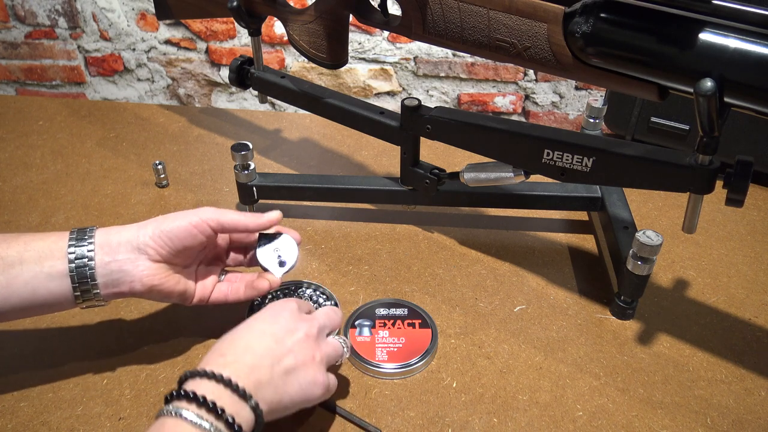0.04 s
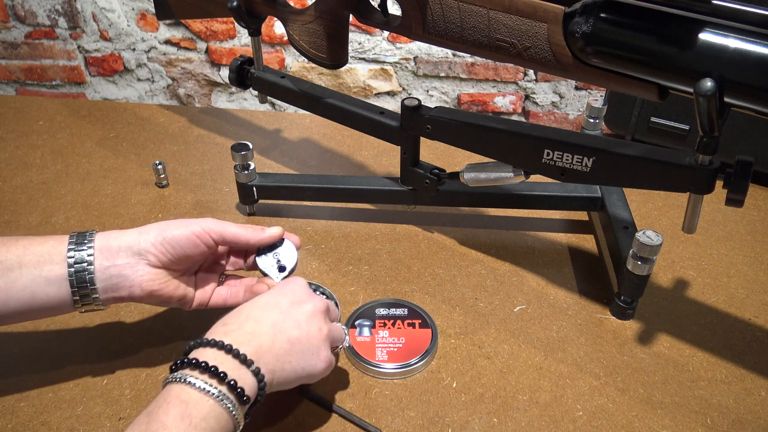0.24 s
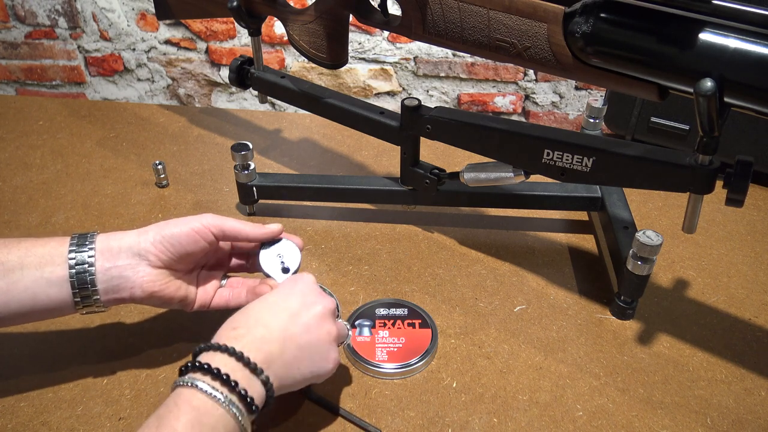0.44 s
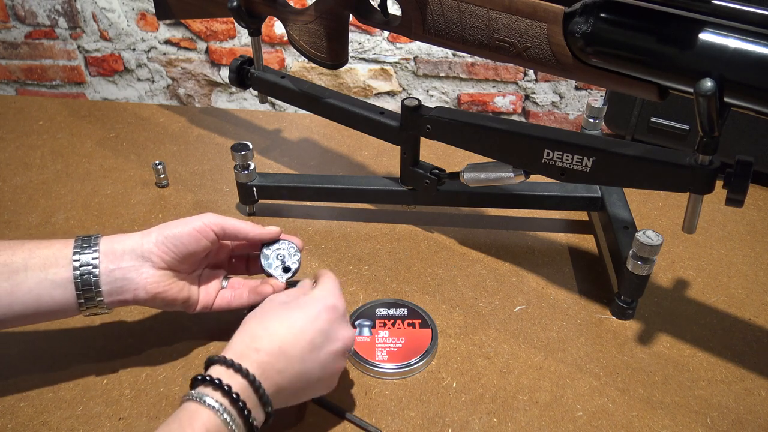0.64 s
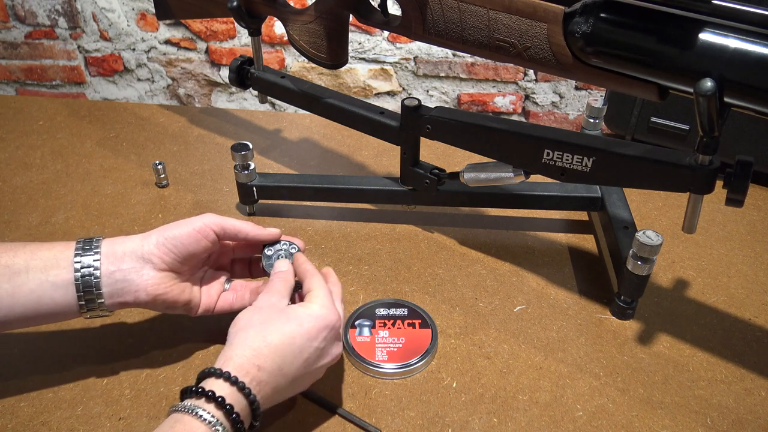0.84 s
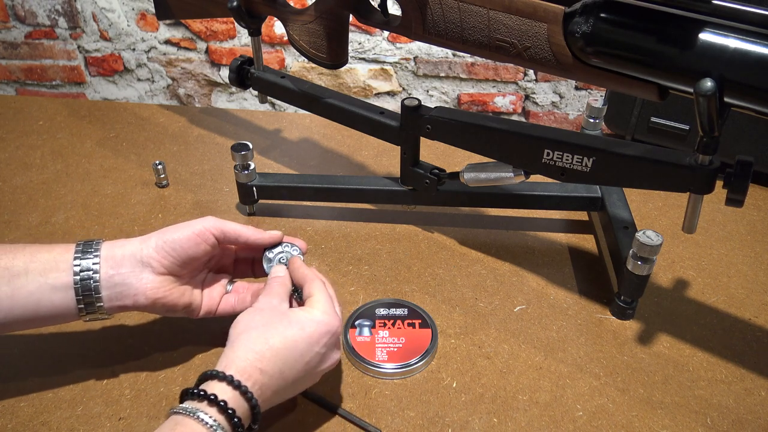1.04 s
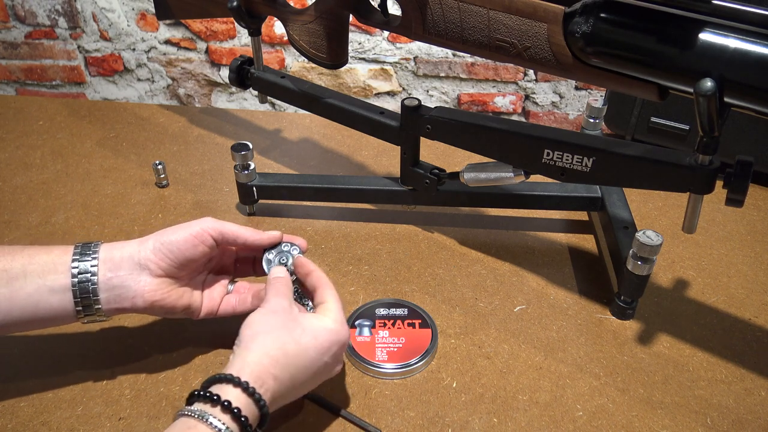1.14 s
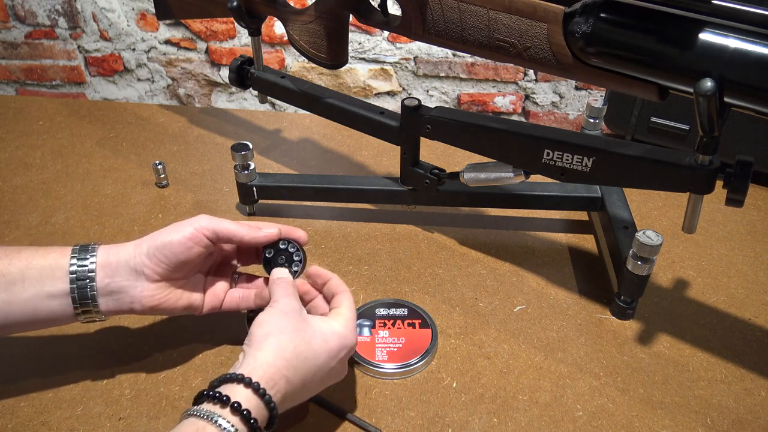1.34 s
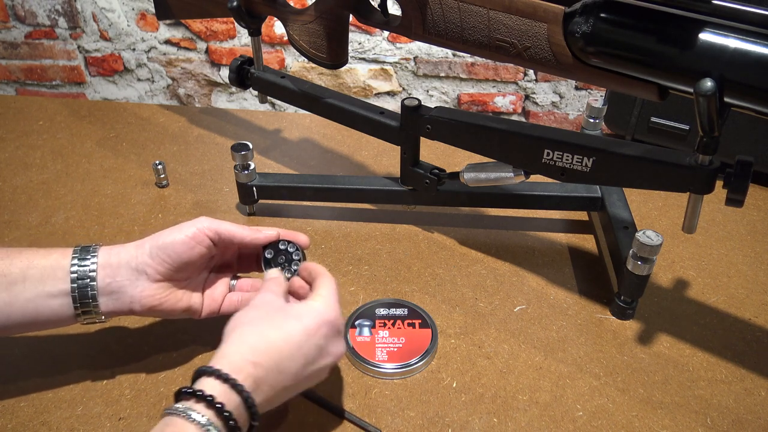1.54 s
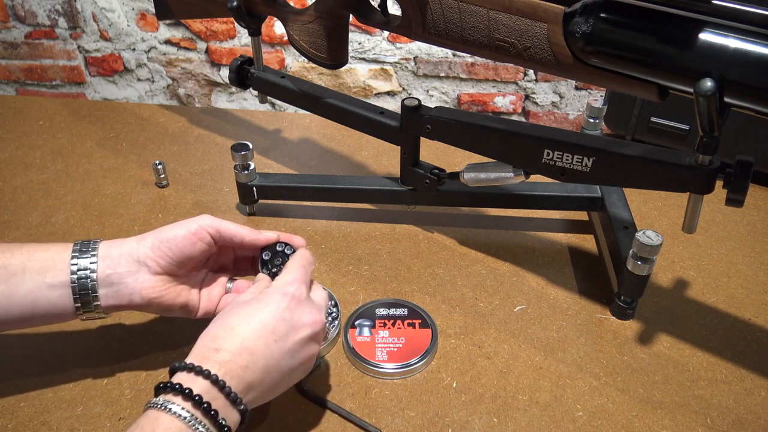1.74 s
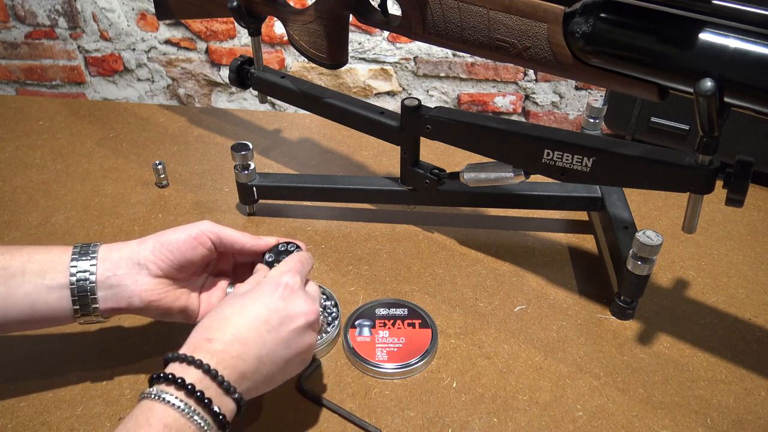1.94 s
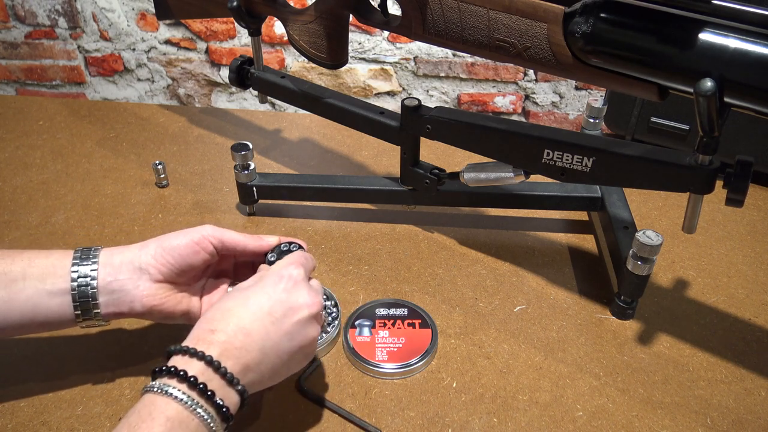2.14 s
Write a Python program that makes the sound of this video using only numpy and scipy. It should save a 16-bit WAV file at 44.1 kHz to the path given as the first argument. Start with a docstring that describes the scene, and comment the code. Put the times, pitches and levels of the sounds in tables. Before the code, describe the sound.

Metal pellets knock and ring briefly in a tin, picked out by hand close to the microphone. Then they go into a small magazine with light, dry clicks and a brief fingertip rub, in a quiet, faintly humming room.

```python
"""A small room with a faint hum, close to a tin on a table.
Fingers fish for metal pellets: the tin knocks, rattles and rings, and one bright ping sounds.
The pellets are then pressed into a small rotary magazine, whose shell gives dry clicks;
a fingertip rubs briefly over it. The room answers with a short diffuse tail."""
import sys
import numpy as np
from scipy import signal
from scipy.fft import rfft, irfft
from scipy.io import wavfile
from scipy.ndimage import uniform_filter1d

SR = 44100
rng = np.random.default_rng(int(sys.argv[2]) if len(sys.argv) > 2 else 0)


def output_pcm(signal):
    """Save a mono or channel-first signal as 16-bit PCM at the path in sys.argv[1].

    Samples are clipped to [-1, 1] before scaling.
    """
    pcm = np.clip(np.atleast_2d(signal).T, -1, 1) * 32767
    wavfile.write(sys.argv[1], SR, np.round(pcm).astype(np.int16))


N = 97020
T = np.arange(N) / SR
BINS_HZ = np.fft.rfftfreq(4096, 1 / SR)


def amp(db):
    """dB to gain."""
    return 10 ** (np.asarray(db) / 20)


def unit_rms(x):
    """Scales to rms 1."""
    return x / np.sqrt(np.mean(x ** 2) + 1e-20)


def curve(points, hz):
    """Interpolates a table over log frequency."""
    freqs, values = np.transpose(points)
    return np.interp(np.log(hz + 1), np.log(freqs + 1), values)


def add(mix, start_s, sound):
    """Mixes a sound in at start_s."""
    part = mix[round(start_s * SR):][:len(sound)]
    part += sound[:len(part)]


def coloured(x, spectrum):
    """Filters by a spectrum table; output rms 1."""
    gain = amp(curve(spectrum, np.fft.rfftfreq(N, 1 / SR)))
    return unit_rms(irfft(rfft(x) * gain, N))


def swells(rows):
    """Sum of Gaussian envelopes."""
    return sum(amp(db) * np.exp(-((T - centre_s) / half_s) ** 2) for centre_s, half_s, db in rows)


def impose(noise, gain, smooth_bins):
    """Levels the noise's broad spectral humps and applies gain, at minimum phase."""
    spectrum = rfft(noise)
    humps = np.sqrt(np.maximum(uniform_filter1d(abs(spectrum) ** 2, size=smooth_bins), 1e-20))
    log_gain = np.log(np.maximum(gain / humps, 1e-5))
    mirrored = np.r_[log_gain, log_gain[-2:0:-1]]
    minimum_phase = np.exp(np.conj(signal.hilbert(mirrored)))[:len(gain)]
    return irfft(spectrum * minimum_phase)


def contact(body_gain, chatter_s, chatter_db):
    """A unit impulse and a short random chatter, through a body."""
    t = T[:2 * len(BINS_HZ) - 2]
    force = rng.standard_normal(len(t)) * np.exp(-(t / chatter_s) ** 2)
    force *= amp(chatter_db) / np.linalg.norm(force)
    force[0] = 1
    return impose(force, body_gain, smooth_bins=60)[:len(BINS_HZ)]


def tail(x, spectrum, t60_table, rise_s):
    """Diffuse tail of x; each band decays at its own rate."""
    hz, t, bands = signal.stft(rng.standard_normal(SR), SR, nperseg=256)
    t60_s = curve(t60_table, hz)[:, None]
    noise = signal.istft(bands * np.exp(-np.log(1000) * t / t60_s), SR)[1][:SR]
    noise *= 1 - np.exp(-T[:SR] / rise_s)
    gain = amp(curve(spectrum, np.fft.rfftfreq(SR, 1 / SR)))
    response = impose(noise, gain, smooth_bins=120)
    return signal.fftconvolve(x, response[:SR // 2])[:N]


# Pellet knocks: (time [s], level [dB], pitch [Hz], bass [dB], treble [dB], top [dB], chatter [dB])
# Bands re level; chatter re first touch.
KNOCKS = [(0.0913,-9,2210,-9,-10,-11.5,9), (0.1034,-5,2930,-5.5,-30,-20,-6),
          (0.114,-12.5,3300,-7,-25,-12,1), (0.1224,-19,1770,5,-22,-10,17), (.199,-3,2980,-32,-22,-22,7),
          (.2079,6,1760,-30,-25,-19,35), (0.2169,2.5,2970,-12,-17,-17,9), (0.2239,2.5,2560,-6,-19,-12.5,19),
          (.232,4,2100,-17,-34,-35,3), (0.2525,10.5,2170,-11.5,-18,-19,21), (0.2765,1,2510,-3,-36,-33,11),
          (.2773,13.5,2910,-16,-9.5,-12,16), (0.288,6.5,1900,-7.5,-27,-26,1),
          (0.2956,7.5,2130,-9,-30,-23,-2), (0.3222,9,2250,-8.5,-11.5,-22,7), (0.3366,8,2780,-9,-34,-22.5,5),
          (0.357,-12,2780,7.5,-28,-30,4), (0.3863,21,2840,-4,-19.5,-27,6), (0.398,5.5,3000,-1,-22,-35,2),
          (0.402,11,2850,-8.5,-22,-20,10), (0.4076,17,3500,-9,-14.5,-13.5,8), (0.419,13,3470,-17,-28,-24,6),
          (.475,-5,3200,-24,-18,-26,-9), (.4528,20,3060,-12.5,-15,-27,5),
          (0.4872,15,3210,-11.5,-15.5,-26.5,0), (0.4953,9.5,3150,-13,-3.5,-24.5,0.5),
          (0.5149,10.5,3140,-13.5,-21,-34,7), (0.5334,9,3100,-25,-13.5,-29.5,10),
          (.548,2,3000,-2.5,-35,-43,3)]

def knocks():
    """Each knock excites a broad, quickly damped resonance of the pellet-filled tin."""
    out = np.zeros(N)
    for start_s, db, pitch_hz, bass, treble, top, chatter_db in KNOCKS:
        broadband = [(80, bass - 28), (150, bass - 1), (1000, bass + 1),
                     (1500, -2), (3700, -5.5), (4400, -10.5),
                     (5100, treble), (6600, treble - 4),
                     (8800, top + 3), (11000, top - 1), (15000, top - 2)]
        resonance = amp(4.5) ** 2 / (1 + ((BINS_HZ - pitch_hz) / 600) ** 2) ** 3
        gain = np.sqrt(amp(curve(broadband, BINS_HZ)) ** 2 + resonance)
        add(out, start_s, amp(db) * contact(gain, chatter_s=0.0034, chatter_db=chatter_db))
    return out


# Pellet shifts: (centre [s], half-length [s], level [dB])
SHIFTS = [(.105, 0.013, -43), (.222, 0.02, -32.5), (.28, 0.022, -29.5)]
# Slip spectrum: (frequency [Hz], relative level [dB])
SHIFT_SPECTRUM = [(150, -12), (1000, -1), (1600, 6.5), (3000, -1), (4500, -21), (6500, -15), (9000, -5.5),
                  (11000, -30), (15000, -28)]

def shifting(slips_per_s=1500):
    """Pellet slips on pellet under the fingers."""
    slips = rng.standard_normal(N) * (rng.random(N) < slips_per_s / SR)
    return coloured(slips, SHIFT_SPECTRUM) * swells(SHIFTS)


# Lingering tin modes: (frequency [Hz], relative level [dB])
TIN_MODES = [(1509, -1.5), (2178, 1), (2320, -4), (2606, -3), (2954, -1), (3124, -4), (3152, -3.5),
             (3313, -9), (3359, -11), (3424, -6), (3449, -6), (3541, 3), (3842, -11)]
# Dense rattle after each knock: (frequency [Hz], gain [dB])
RATTLE_SPECTRUM = [(90, -23), (160, -5.5), (300, -1.5), (700, -1), (1500, -5.5), (3200, -8), (5000, -1),
                   (8000, -14), (15000, -17)]
# Rattle decay: (frequency [Hz], T60 [s])
RATTLE_T60 = [(150, 0.37), (700, 0.48), (1500, 0.71), (3500, 0.62), (6000, 0.4), (9000, 0.61),
              (15000, 0.13)]

def tin(release_s=0.38, held_db=-4.5, ring_db=-47.5, ring_t60_s=0.4):
    """Knocks and slips drive the tin's rattle and modes, more so once the fingers let go."""
    direct = knocks() + shifting()
    drive = direct * np.where(T < release_s, amp(held_db), 1)
    retention = np.exp(-2 * np.log(1000) / (ring_t60_s * SR))
    energy = signal.lfilter([1], [1, -retention], drive ** 2)
    ring = np.zeros(N)
    for hz, db in TIN_MODES:
        ring += amp(ring_db + db) * np.sqrt(energy) * np.sin(2 * np.pi * (hz * T + rng.random()))
    return direct + ring + tail(drive, RATTLE_SPECTRUM, RATTLE_T60, rise_s=0.0016)


# Ping partials: (frequency [Hz], level [dB])
PING_PARTIALS = [(8280, -33), (9340, -28), (14890, -33)]

def ping(start_s=0.3866, hold_s=0.036, t60_s=0.082, after_db=-19, after_t60_s=0.42):
    """Thin metal rings high, is damped, and leaves a faint after-ring."""
    t = T[:SR // 2]
    envelope = amp(-60 * np.maximum(t - hold_s, 0) / t60_s)
    envelope += amp(after_db - 60 * t / after_t60_s)
    out = np.zeros(N)
    for hz, db in PING_PARTIALS:
        waver = 1 + 0.3 * unit_rms(uniform_filter1d(rng.standard_normal(len(t)), size=350))
        add(out, start_s, amp(db) * envelope * waver * np.sin(2 * np.pi * hz * t))
    return out


# Clicks: (time [s], hollow body [dB], shell [dB], pellet tick [dB], top [dB], chamber pitch [Hz])
CLICKS = [(.0295,-10.5,-15,2.5,-17,4700), (0.9177,11,2.5,-8,-16,4550), (0.9241,0,-3.5,-0.5,-10.5,4600),
          (.929,5.5,-2,3.5,-10,4560), (0.9336,-10,-21,-18,-35,4600), (0.9434,-9,-15,-12,-33,4220),
          (0.9469,-6,-21,-20,-36,4400), (0.954,-10.5,-26,-18,-40,4500), (1.2182,7,-16,-13,-31,4200),
          (1.2204,4.5,-1.5,13,-4,4270), (1.2285,2,-8,-20,-21,3730), (1.2343,-8,-7,0,-16,4670),
          (1.238,-7,-5,0,-18,4000), (1.2427,12,10.5,11.5,1,4350), (1.407,-19,-10.5,-17,-21,3830),
          (1.413,-7,-15,-11,-24,4300), (1.623,-9.5,-12,1.5,-11.5,3570), (1.653,-13,-17,-5,-18,3830),
          (1.6574,-15,-16,-24,-31,3300), (1.677,-20,-16.5,-35,-46,3180), (1.7413,-30,-17.5,-1.5,-11,4560),
          (1.766,-18,-15,-22,-41,3850), (1.781,-9,-18,-7.5,-12,4430), (1.787,-2,-17,-12,-31,4100),
          (1.794,-14,-15,-29,-39,3900), (1.923,-50,-15.5,1.5,-14.5,4500), (1.9556,-33,-17,-30,-38,3200),
          (2.016,-13,-14,-11,-26,4380), (2.04,-23,-17,-22,-40.5,3860)]
# Magazine resonances: (frequency [Hz], width [Hz], gain [dB])
MAGAZINE_MODES = [(1890, 434, 1), (3060, 290, 4.5), (6320, 520, -2), (9300, 1800, 0), (10660, 630, -4.5),
                  (12340, 700, 1.5), (16200, 1100, -8)]

def magazine():
    """Dry clicks share the shell's resonances; chamber pitch depends on where the pellet sits."""
    out = np.zeros(N)
    for start_s, body_db, shell_db, tick_db, top_db, chamber_hz in CLICKS:
        drives_db = [body_db, shell_db, tick_db] + [top_db] * 4  # one per mode
        peaks = [(hz, width, db + drive) for (hz, width, db), drive in zip(MAGAZINE_MODES, drives_db)]
        peaks += [(chamber_hz, 560, shell_db + 5.5), (850, 300, shell_db - 15)]
        power = sum(amp(db) ** 2 / (1 + ((BINS_HZ - hz) / width) ** 2) ** 2 for hz, width, db in peaks)
        chatter_s = 0.002 * 2 ** (shell_db / 25)  # harder clicks chatter longer
        add(out, start_s, contact(np.sqrt(power), chatter_s, chatter_db=10))
    return out


# Finger slides: (centre [s], half-length [s], level [dB])
RUBS = [(1.325, 0.022, -62), (1.945, 0.046, -49.5)]
# Rub spectrum: (frequency [Hz], relative level [dB])
RUB_SPECTRUM = [(1000, -47), (3200, 4), (5000, -3), (5900, -14), (6400, 10.5), (6900, 4), (8000, -8),
                (10000, -4), (12200, -5), (13100, 2), (13900, -9), (15500, -11)]

def rubbing(grains_per_s=6000):
    """Fingertip stick-slip, coloured by the magazine."""
    grains = rng.standard_normal(N) * (rng.random(N) < grains_per_s / SR)
    return coloured(grains, RUB_SPECTRUM) * swells(RUBS)


# Diffuse room ring: (frequency [Hz], relative level [dB])
OPENING_SPECTRUM = [(200, -10), (1200, -16), (3300, -2.5), (4500, -6.5), (6400, -12), (9000, -18.5),
                    (15000, -28)]

def opening_ring(start_db=-45, t60_s=0.31):
    """The room is still ringing faintly at the start, from an earlier knock."""
    return coloured(rng.standard_normal(N), OPENING_SPECTRUM) * amp(start_db - 60 * T / t60_s)


# Room response: (frequency [Hz], gain [dB])
ROOM_SPECTRUM = [(200, -16), (1500, -10), (2500, -23), (3100, -10.5), (3700, -13), (4900, -15),
                 (5600, -25.5), (6300, -17), (8000, -13.5), (15000, -24.5)]
# Room decay: (frequency [Hz], T60 [s])
ROOM_T60 = [(200, 0.22), (3000, 0.41), (7000, 0.45), (15000, 0.12)]

def room(direct):
    """Diffuse reflections of the small room."""
    return tail(direct, ROOM_SPECTRUM, ROOM_T60, rise_s=0.0017)


def table_bump(centre_s=1.535, half_s=0.053, hz=44, db=-46.5):
    """One soft, low bump of the table."""
    return swells([(centre_s, half_s, db)]) * np.sin(2 * np.pi * hz * T)


# Hum partials: (frequency [Hz], rms level [dB])
HUM_PARTIALS = [(100, -63.5), (200, -67.5), (299, -63.5)]
# Room tone: (frequency [Hz], relative density [dB])
AIR_SPECTRUM = [(15, -30), (30, -4), (47, -0.5), (70, -4), (105, -3.5), (145, -5), (200, -0.5), (290, -1.5),
                (400, -6.5), (700, -5.5), (1200, -6.5), (1700, -9.5), (2400, -12), (3100, -10.5),
                (4500, -17), (6500, -23.5), (9500, -29.5), (15500, -33.5)]

def background(air_db=-51):
    """Steady room tone and faint hum."""
    hum = sum(amp(db) * np.sqrt(2) * np.sin(2 * np.pi * (hz * T + rng.random()))
              for hz, db in HUM_PARTIALS)
    return amp(air_db) * coloured(rng.standard_normal(N), AIR_SPECTRUM) + hum


def scene():
    """Mono mix of handling, room and background."""
    direct = tin() + ping() + magazine() + rubbing()
    return (direct + room(direct) + opening_ring() + table_bump() + background())[None]


def record(dry, ceiling=0.72, cutoff_hz=16100):
    """Soft peak limit, then low-pass."""
    limited = dry / (1 + (dry / ceiling) ** 4) ** (1 / 4)
    lowpass = signal.firwin(201, cutoff_hz, window=("kaiser", 9), fs=SR)
    return signal.oaconvolve(limited, lowpass[None], "same")


dry = scene()
out = record(dry)
output_pcm(out)
```